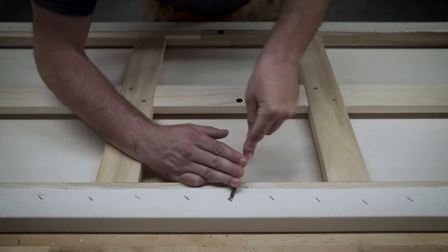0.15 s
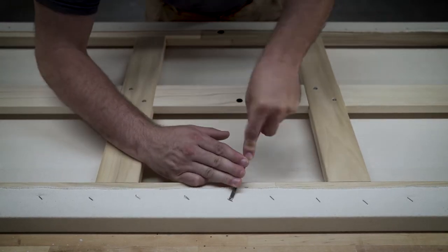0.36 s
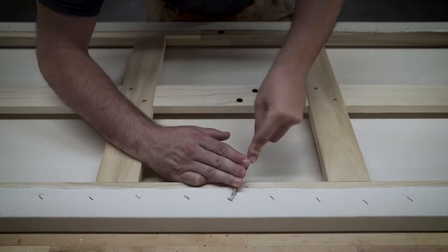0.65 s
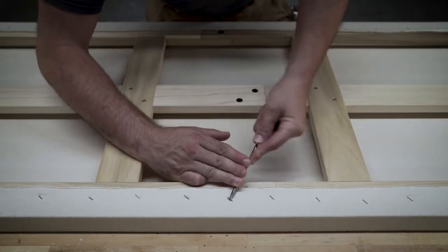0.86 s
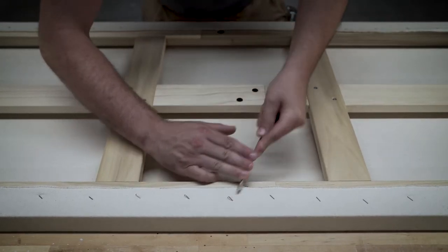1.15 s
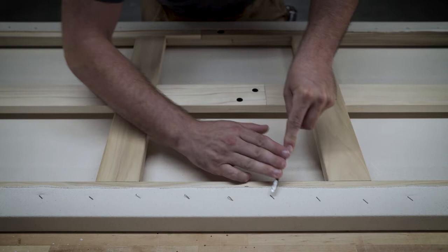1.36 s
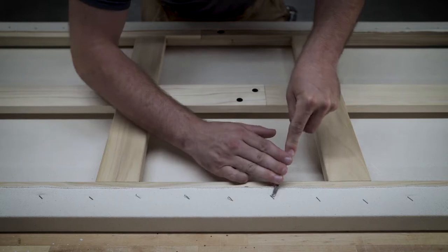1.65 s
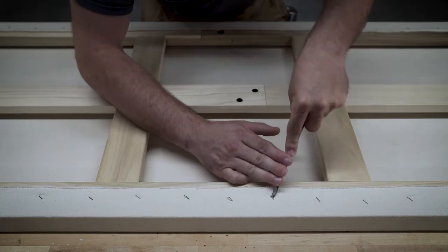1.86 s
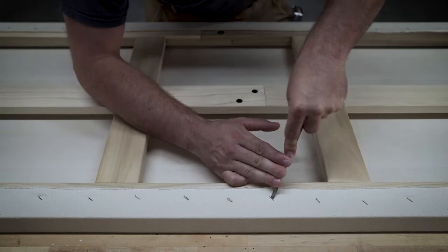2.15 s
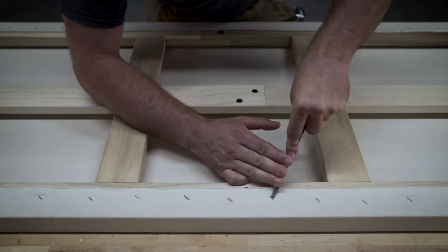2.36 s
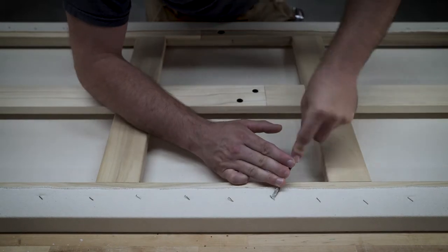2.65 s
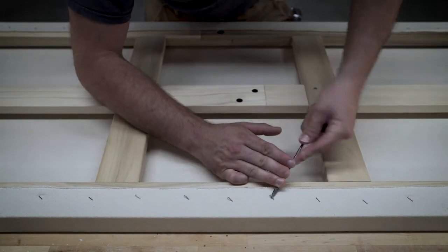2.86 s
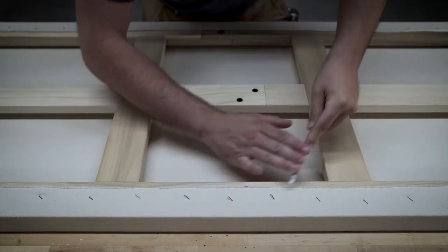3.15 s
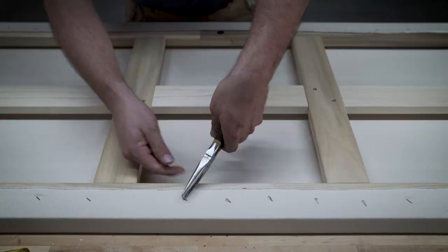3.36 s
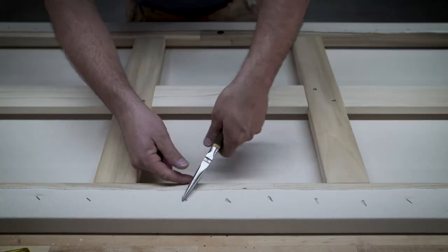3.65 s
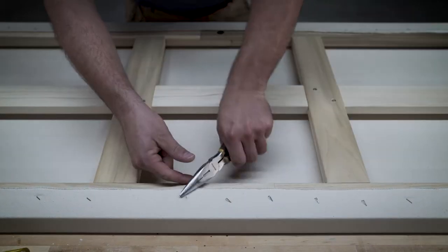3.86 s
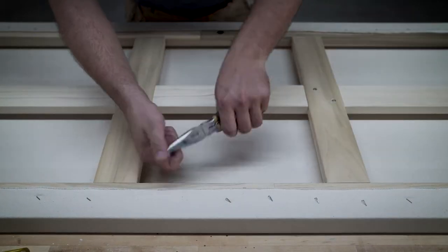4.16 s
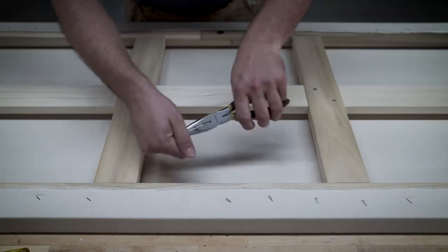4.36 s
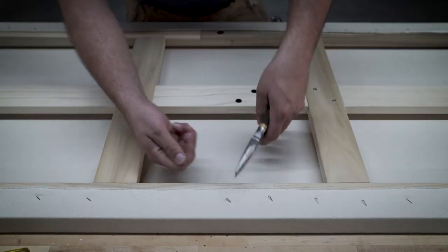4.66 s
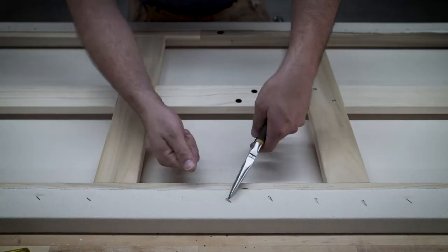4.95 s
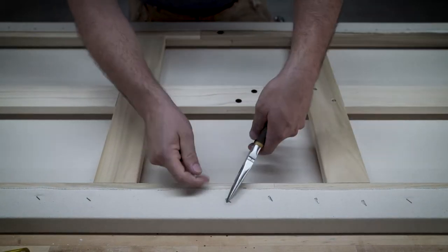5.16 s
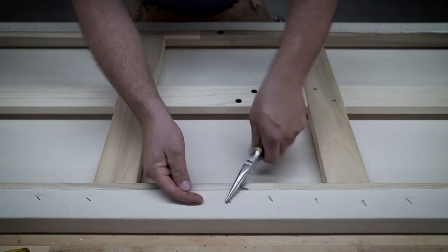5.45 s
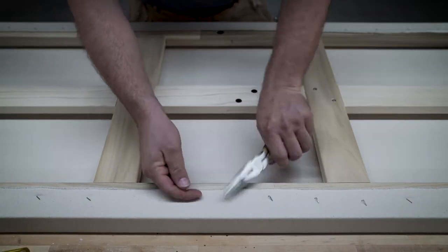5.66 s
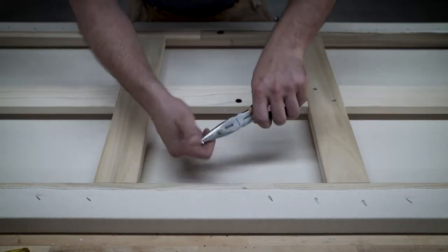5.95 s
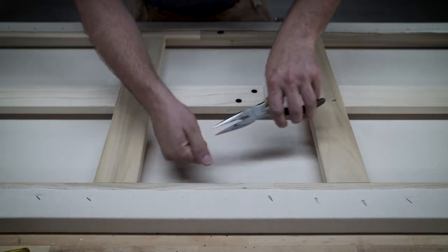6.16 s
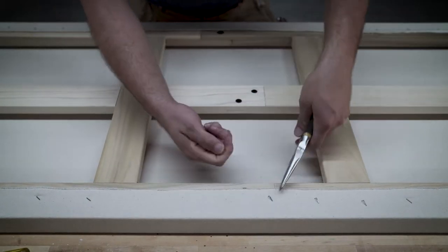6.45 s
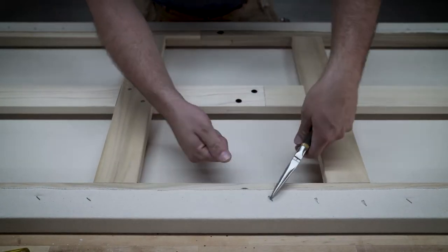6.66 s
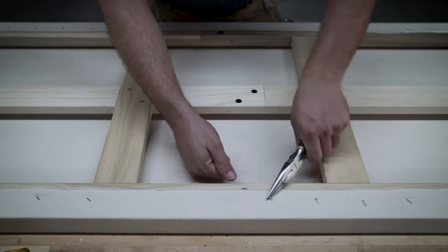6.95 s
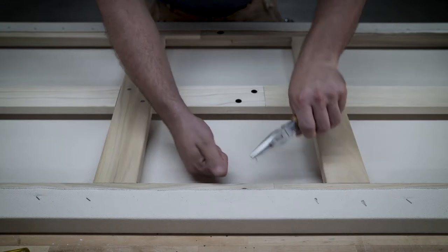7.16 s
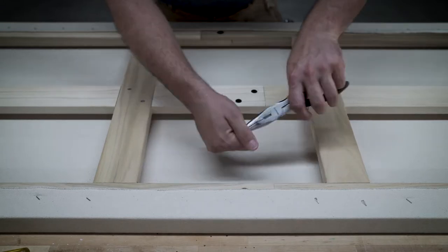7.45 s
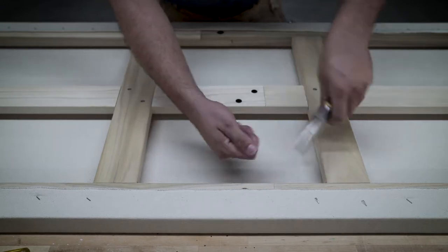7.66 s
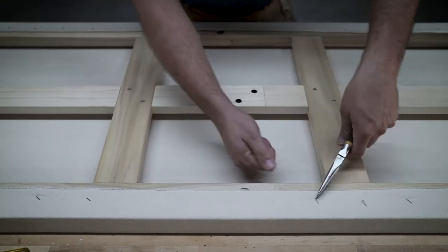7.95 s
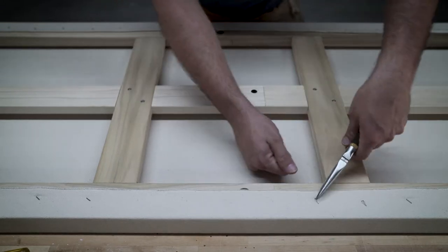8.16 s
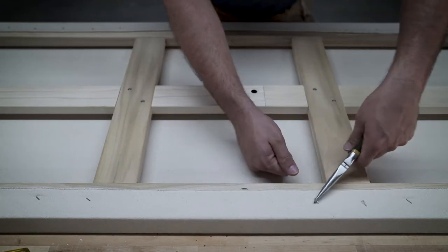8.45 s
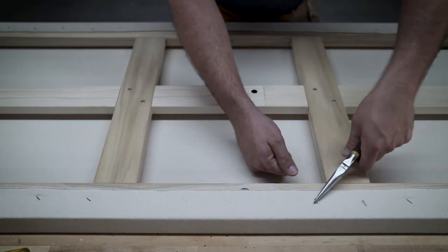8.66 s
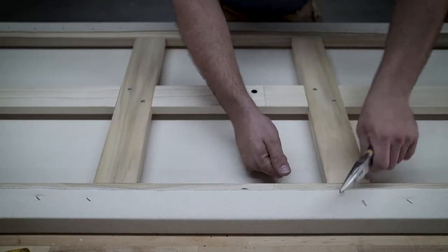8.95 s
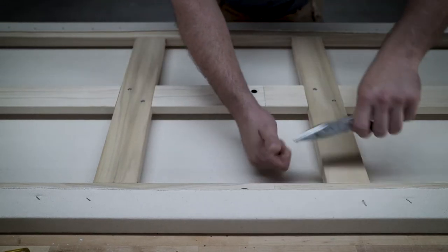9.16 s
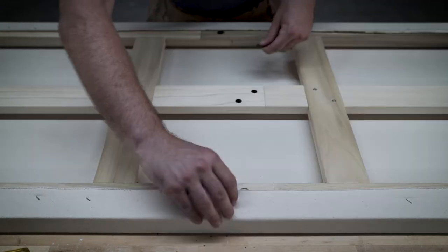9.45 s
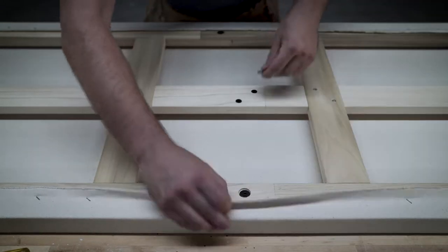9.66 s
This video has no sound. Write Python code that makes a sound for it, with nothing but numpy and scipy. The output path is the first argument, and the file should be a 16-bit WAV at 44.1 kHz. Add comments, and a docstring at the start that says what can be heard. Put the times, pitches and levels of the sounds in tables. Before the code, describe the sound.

Steel tool knocks and scrapes on a wooden frame, then staples snap free of canvas with sharp loud cracks over a faint fan hum.

```python
"""A fan hums faintly throughout, and a small workshop answers every contact with noise-like reverberation.
First a thin steel lever, then heavy long-nosed pliers work staples out of a canvas on a wooden frame.
Knocks and ticks are filtered impulses with modes, thumps are slow modes; creaks and rustles are runs of tiny slips.
Each staple snaps free, often one leg after the other: a crack with scatter, a jolt in the wood, a ring of wire."""
import sys
import numpy as np
from scipy import signal
from scipy.fft import rfft, irfft, next_fast_len
from scipy.io import wavfile

SR = 44100
rng = np.random.default_rng(int(sys.argv[2]) if len(sys.argv) > 2 else 0)


def transcribe(u):
    """Save the signal u as a 16-bit wav file named by the first command-line argument.

    u: samples, shape (n,) or (channels, n), limited to [-1, 1]; the rate is SR.
    q: integer samples, one column per channel.
    """
    v = np.clip(np.atleast_2d(u).T, -1, 1)
    q = np.round(v * 32767).astype(np.int16)
    wavfile.write(sys.argv[1], SR, q)


N = 432621
SIZE = 16384  # samples of one event
AGE = np.arange(SIZE) / SR  # s since the event began


def undb(db):
    """Level in dB to amplitude."""
    return 10 ** (np.asarray(db) / 20)


def unit(x):
    """Scale to rms 1."""
    return x / np.sqrt(np.mean(x ** 2))


def add(track, time_s, sound):
    """Mix a sound into a track at a time."""
    i = max(int(time_s * SR), 0)
    track[i:i + len(sound)] += sound[:max(N - i, 0)]


def bins_hz(size):
    """Frequencies of the bins of a spectrum."""
    return np.arange(size // 2 + 1) * SR / size


def along(points, size):
    """Interpolate (Hz, value) points over log frequency on the bins of a spectrum."""
    hz, value = np.transpose(points)
    return np.interp(np.log(bins_hz(size) + 1), np.log(np.sort(hz)), value)


def response(colour, centre_hz):
    """Minimum-phase impulse response of a colour moved from 1 kHz to a centre, peak 1."""
    moved = [(hz * centre_hz / 1000, db) for hz, db in colour]
    cepstrum = irfft(np.log(undb(along(moved, SIZE))))
    # fold the cepstrum forward in time: nothing sounds before the push
    cepstrum[1:SIZE // 2] *= 2
    cepstrum[SIZE // 2 + 1:] = 0
    h = irfft(np.exp(rfft(cepstrum)))
    return h / np.abs(h).max()


def blow(colour, centre_hz, fade_s, scatter_db):
    """One sharp push and a dying scatter of smaller ones, heard through a colour."""
    push = undb(scatter_db) * rng.standard_normal(SIZE) * np.exp(-AGE / fade_s)
    push[0] = 1
    return signal.fftconvolve(push, response(colour, centre_hz))[:SIZE]


def ring(hz, t60_s):
    """One mode: a sine that decays by 60 dB in t60."""
    return np.sin(2 * np.pi * hz * AGE) * np.exp(-np.log(1000) * AGE / t60_s)


# spectrum of the background air: (frequency [Hz], relative level per Hz [dB])
AIR = [(15, -59.5), (25, -35.5), (43, -19.5), (134, -15), (195, -17), (236, -12), (384, -14), (427, -6.5),
       (476, -12), (607, -18.5), (659, -14.5), (962, -17), (1370, -20.5), (3160, -27), (16000, -36)]
# fan tones: (frequency [Hz], width [Hz], level [dB])
FAN = [(425.9, 12, -64.5), (618.8, 17, -69), (900, 62, -72.5), (1950, 100, -72.5), (13297, 200, -89.5)]


def fan():
    """Even air noise with a few narrow, wavering tones cut from noise by resonance curves."""
    size = next_fast_len(N, True)
    hz = bins_hz(size)
    air = unit(irfft(rfft(rng.standard_normal(size)) * undb(along(AIR, size)), size))
    noise = rfft(rng.standard_normal(size))
    tones = 0
    for tone_hz, width_hz, db in FAN:
        resonance = 1 / (1 + (2 * (hz - tone_hz) / width_hz) ** 2)
        tones = tones + undb(db) * unit(irfft(noise * resonance, size))
    return (undb(-59.5) * air + tones)[:N]


# workshop reverberation bands: (centre [Hz], t60 [s], relative level [dB])
ROOM = [(80.04, 0.31, -1), (250, 0.47, 4.5), (633, 0.51, 4.5), (1500, 0.43, 5.5), (3000, 0.62, -7),
        (5200, 0.43, -1), (7200, .47, 0), (9500, 0.32, -2), (15440, .25, -9)]


def room(x, wet_db, build_s=.002):
    """Diffuse reflections build up quickly, then die at each band's own rate."""
    t = np.arange(SR) / SR
    noise, tail = rfft(rng.standard_normal(SR)), 0
    for k, (_, t60_s, db) in enumerate(ROOM):
        # this band's share: 1 at its centre, 0 at its neighbours'
        share = along([(row[0], j == k) for j, row in enumerate(ROOM)], SR)
        tail = tail + undb(db) * irfft(noise * share, SR) * np.exp(-np.log(1000) * t / t60_s)
    tail = tail * (1 - np.exp(-t / build_s))
    return undb(wet_db) * signal.fftconvolve(x, tail)[:N]


def hollow(x, centre_hz, depth):
    """The bounce off the workbench partly cancels one band."""
    band = signal.lfilter(*signal.iirpeak(centre_hz, 2, fs=SR), x)
    return x - np.clip(depth, 0, 1) * band


# low thumps of frame and cloth: soft pushes, pliers landing, recoils of snaps:
# (time [s], level [dB], centre of the thump [Hz])
BUMPS = [(.005, -45, 75), (0.823, -47, 184), (3.446, -37, 360), (3.763, -47.5, 350), (4.013, -47, 220),
         (4.066, -34.5, 229), (5.297, -47, 330), (5.351, -45, 130), (5.412, -49, 90), (5.825, -47, 150),
         (6.746, -35, 360), (6.915, -42, 125), (7.004, -30, 99), (7.149, -32, 235), (8.253, -39, 160),
         (8.378, -41.5, 350), (8.724, -44, 127), (9.063, -37, 161.4)]
# slow modes of the frame with its stretched cloth: (frequency [Hz], relative level [dB], t60 [s])
SWAY = [(75, -9, .42), (92, -2, 0.24), (125, 0.5, .2), (201, 1.5, 0.15), (239, -1, 0.098), (360, 2, 0.33)]
SWAY_DB_PER_OCTAVE, BUMP_RISE_S = -11.5, 0.0056


def bumps():
    """A thump sets frame and cloth swinging, most in the modes near its own centre."""
    out = np.zeros(N)
    for time_s, db, bump_hz in BUMPS:
        swing = 0
        for hz, mode_db, t60_s in SWAY:
            octaves_off = abs(np.log2(hz / bump_hz))
            swing = swing + undb(mode_db + SWAY_DB_PER_OCTAVE * octaves_off) * ring(hz, t60_s)
        add(out, time_s, undb(db) * swing * (1 - np.exp(-AGE / BUMP_RISE_S)))
    return out


def friction(strokes, colour, slips_per_s, grain_db, catch_db):
    """A stroke is a swelling run of tiny uneven slips that catches and frees; it lasts SIZE samples at most."""
    out = np.zeros(N)
    for start_s, end_s, db, hz in strokes:
        sizes = undb(grain_db * np.minimum(rng.exponential(size=SIZE), 3))
        catches = undb(catch_db * np.repeat(rng.standard_normal(SIZE // 256), 256))  # 256-sample steps
        struck = rng.random(SIZE) < slips_per_s / SR
        slips = struck * rng.choice([-1, 1], SIZE) * sizes * catches
        rub = unit(signal.fftconvolve(slips, response(colour, hz))[:SIZE])
        progress = np.clip(AGE / max(end_s - start_s, .005), 0, 1)
        swell = np.abs(np.sin(np.pi * progress)) ** .75
        add(out, start_s, undb(db) * rub * swell)
    return out


# rustles and slides over the canvas, and one faint high tinkle:
# (start [s], end [s], level [dB], centre [Hz])
SLIDES = [(.912, .955, -48.5, 4030), (1.235, 1.305, -49.5, 4330), (2.903, 2.922, -42, 4303),
          (3.205, 3.27, -49, 4000), (3.84, 3.96, -59, 7000), (4.94, 5.08, -50, 4000),
          (5.273, 5.295, -46.5, 4120), (5.59, 5.66, -56.5, 7000), (6.67, 6.765, -49.5, 4000),
          (6.83, 6.865, -51, 4500), (6.895, 6.935, -50, 6000), (6.208, 6.232, -53.5, 10000),
          (7.598, 7.632, -43, 9050), (8.343, 8.375, -44.5, 4600), (8.59, 8.625, -35.5, 4830),
          (8.81, 8.88, -58, 6000), (9.50, 9.70, -57, 6530), (9.73, 9.81, -57, 7700)]
# their colour, centred on 1 kHz: (frequency [Hz], relative level [dB])
CLOTH = [(100, -23), (400, -7.5), (750, -2), (1100, -3.5), (1600, -10), (2500, -21), (4500, -38.5)]


def slides():
    """Rustles and slides over the canvas, and one faint high tinkle, all as runs of uneven slips."""
    return friction(SLIDES, CLOTH, slips_per_s=1300, grain_db=3, catch_db=2.5)


# drags of the steel point: (start [s], end [s], level [dB])
SQUEAKS = [(1.165, 1.56, -65.5), (2.011, 2.153, -58.5), (3.2, 3.244, -64), (3.502, 3.619, -56),
           (4.937, 5.05, -57)]
# resonances of the dragged point, the lowest at 1 kHz: (frequency [Hz], relative level [dB])
SQUEAK = [(400, -20), (850, -8), (1000, 0), (1150, -31), (1350, -4), (1500, -10), (1650, -16), (1950, -13),
          (2220, -5.5), (2450, -24), (6000, -21.5)]
SQUEAK_HZ = 2100  # where the lowest resonance is moved


def squeaks():
    """The dragged steel point sings faintly: slips excite its resonances."""
    strokes = [(*row, SQUEAK_HZ) for row in SQUEAKS]
    return friction(strokes, SQUEAK, slips_per_s=760, grain_db=1.5, catch_db=0)


# creaks and rasps of wire, wood and pulled canvas: (start [s], end [s], level [dB])
CREAKS = [(.01, 0.042, -55.5), (0.789, 0.846, -46), (1.223, 1.305, -48), (2.008, 2.135, -52.5),
          (3.20, 3.253, -47), (3.652, 3.682, -46.5), (3.851, 3.993, -45), (3.993, 4.048, -39.5),
          (5.286, 5.354, -47.5), (5.575, 5.714, -46), (5.787, 5.809, -37), (6.733, 6.771, -40.5),
          (6.852, 6.884, -40), (6.899, 6.93, -34.5), (6.96, 7.096, -45), (7.104, 7.139, -34.5),
          (8.592, 8.641, -33), (8.665, 8.919, -46.5), (9.549, 9.604, -33)]
# their colour, centred on 1 kHz: (frequency [Hz], relative level [dB])
CREAK = [(80, -33.5), (240, -9), (400, 2), (620, -6), (850, -1.5), (1000, -4.5), (1300, -9.5), (1800, -14),
         (4000, -30), (10000, -42.5)]
CREAK_HZ = 1584


def creaks():
    """Wire, wood and pulled canvas creak and rasp in runs of uneven slips."""
    strokes = [(*row, CREAK_HZ) for row in CREAKS]
    return friction(strokes, CREAK, slips_per_s=950, grain_db=3, catch_db=2.0)


# light ticks, and one dull knock: (time [s], level [dB], centre [Hz])
TICKS = [(0.8285, -31, 3330), (1.0015, -21.5, 4000), (1.2115, -35.5, 2500), (1.2917, -27, 3000),
         (3.2247, -35, 2440), (3.996, -28.5, 2297), (6.128, -38.5, 3350), (7.6003, -26.5, 3600),
         (7.6109, -34.5, 2340), (7.6204, -37, 2180), (8.2505, -35, 1500), (8.3695, -16, 4840),
         (8.471, -41.5, 3860), (8.6046, -26, 3000), (9.0335, -29.5, 3200), (9.3923, -34.5, 2730)]
# colour of steel, centred on 1 kHz, also in the knocks: (frequency [Hz], relative level [dB])
STEEL = [(60, -29.5), (250, -10), (550, -3.5), (900, -3.5), (1500, -11), (2300, -19), (3300, -23.5),
         (5000, -25)]
# modes of the steel tool, damped by the hand: (frequency [Hz], relative level [dB], t60 [s])
TOOL = [(2200, -28.5, 0.015), (2800, -26.5, .015), (3620, -15.5, 0.03), (4510, -14, .015),
        (6340, -29.5, 0.009)]


def ticks():
    """Light ticks and one dull knock; the tool rings briefly, differently each time."""
    out = np.zeros(N)
    for time_s, db, hz in TICKS:
        rings = 0
        for mode_hz, mode_db, t60_s in TOOL:
            rings = rings + rng.uniform(-1, 1) * undb(mode_db) * ring(mode_hz, t60_s)
        add(out, time_s, undb(db) * (blow(STEEL, hz, fade_s=0.0029, scatter_db=-18.5) + rings))
    return out


# modes of the frame: (frequency [Hz], relative level [dB], t60 [s])
FRAME = [(153.6, -16.5, 0.084), (176, -15, 0.14), (255, -9.5, 0.059), (329.6, -3.5, 0.11), (360, -15, 0.33),
         (410, -2.5, .08), (472.4, -6, 0.12), (563.4, -8.5, .09), (641, -6.5, 0.069), (783, -6, 0.18),
         (1345, -6, .05), (1660, -2, 0.077)]


def frame(spread_db=3, detune=0.025):
    """The frame's modes, peak 1; each place of contact and grip weights and shifts them differently."""
    modes = 0
    for hz, db, t60_s in FRAME:
        weight, shift, sign = rng.standard_normal(3)
        mode = ring(hz * (1 + detune * shift), t60_s)
        modes = modes + np.sign(sign) * undb(db + spread_db * weight) * mode
    return modes / np.abs(modes).max()


def bend(x, lag_s, fast_hz):
    """Bending waves in wood travel faster the higher they are, so the lows arrive late: a downward sweep."""
    size = next_fast_len(N + SR, True)
    hz = bins_hz(size) + SR / size
    delay_s = lag_s * np.maximum(np.sqrt(fast_hz / np.maximum(hz, 100)) - 1, 0)
    phase = 2 * np.pi * np.cumsum(delay_s) * SR / size  # phase is delay summed over frequency
    return irfft(rfft(x, size) * np.exp(-1j * phase), size)[:N]


# tool knocks on the frame: (time [s], wood level [dB], wood centre [Hz], relative steel level [dB])
KNOCKS = [(0.194, -42.5, 540, -56), (0.251, -25.5, 1050, -66), (0.51, -41, 640, -68),
          (0.541, -30.5, 630, -72), (0.651, -17.5, 1180, -63), (0.822, -35, 695, -61),
          (0.883, -41, 627, -51), (0.907, -41, 660, -68), (1.613, -31.5, 517, -44.5),
          (2.059, -34.5, 720, -69), (2.35, -20.5, 1380, -38), (2.561, -24.5, 1280, -62),
          (2.801, -40, 716, -64), (2.858, -33.5, 666, -44), (3.093, -39, 760, -49), (3.444, -41, 433, -50),
          (3.485, -39.5, 454, -50.5), (3.705, -37, 480, -43), (3.759, -25, 527, -45),
          (3.845, -30, 1550, -36.5), (3.927, -29.5, 580, -63), (3.946, -37.5, 617, -36.5),
          (5.291, -21, 700, -27.5), (5.328, -28, 665, -45), (5.346, -33, 640, -48),
          (5.388, -35, 410, -48.5), (5.496, -25, 700, -42.5), (5.602, -34.5, 1660, -65),
          (6.736, -29.5, 645, -41.5), (6.759, -28.5, 422, -60), (6.861, -28.5, 650, -48),
          (6.916, -22.5, 675, -35), (6.968, -17.5, 503, -26.5), (8.376, -33.5, 426, -31),
          (8.611, -17, 1730, -35), (8.714, -24.5, 790, -32.5), (8.778, -39.5, 590, -43),
          (9.576, -25.5, 1700, -60)]
# colour of wood, centred on 1 kHz, also in the snaps: (frequency [Hz], relative level [dB])
WOOD = [(100, -26), (300, -15.5), (600, -4), (1000, 7.5), (1600, -2.5), (2500, -6.5), (5000, -28.5),
        (14000, -65.5)]
PLIERS_FROM_S = 3.3  # the light lever is swapped for the heavy pliers
# frame level under a knock of KNOCK_DB; a hard-pressed tool damps it, so it gains less than 1 dB per dB
KNOCK_DB, LEVER_FRAME_DB, PLIERS_FRAME_DB, FRAME_DB_PER_DB = -30.5, -46, -32, 0.35


def knocks(scatter_db):
    """The steel tip ticks, the wood under it clacks, the whole frame rings on, more under the heavy pliers."""
    steel, wood = np.zeros(N), np.zeros(N)
    for time_s, wood_db, hz, steel_db in KNOCKS:
        frame_db = LEVER_FRAME_DB if time_s < PLIERS_FROM_S else PLIERS_FRAME_DB
        frame_db += FRAME_DB_PER_DB * (wood_db - KNOCK_DB)
        tip = blow(STEEL, centre_hz=4000, fade_s=0.0025, scatter_db=-10.5)
        clack = blow(WOOD, hz, fade_s=0.0073, scatter_db=scatter_db)
        add(steel, time_s, undb(steel_db + 5.5) * tip)
        add(wood, time_s, undb(wood_db) * clack + undb(frame_db) * frame())
    return steel + bend(wood, lag_s=0.002243, fast_hz=2365)


def wire_ring(hz, t60_s, spread=0.007):
    """A bent wire has clusters of close modes that beat."""
    return sum(ring(hz * (1 + spread * c), t60_s) for c in rng.standard_normal(4)) / 2


def splinter_db(fade_s, doubling_s=0.0027):
    """Energy that splintering adds to the first crack: the longer it lasts, the more."""
    return 10 * np.log10(1 + fade_s / doubling_s)


# a staple leg lets go: (time [s], crack level [dB], crack centre [Hz], splintering decay [s])
SNAPS = [(2.9342, 4.5, 5200, .0018), (4.0113, -6.5, 3430, 0.0045), (4.064, 1.5, 3190, 0.00092),
         (4.0787, -8.5, 2730, 0.0022), (5.811, -4, 3050, 0.0026), (5.8235, -9, 2800, 0.0061),
         (7.1367, -14.5, 3900, .001), (7.139, -2.5, 2600, .003), (7.1485, -7.5, 2900, 0.0023),
         (7.1510, 1, 3070, 0.00088), (9.0467, -7.5, 3800, .0011), (9.0505, -0.5, 3640, .0018),
         (9.0620, 3.5, 2830, 0.0021), (9.0645, -11, 1900, 0.0014), (9.0657, -3, 2630, .002),
         (9.078, -10, 3000, 0.0022)]
# colour of the crack, centred on 1 kHz: (frequency [Hz], relative level [dB])
CRACK = [(30, -31.5), (100, -19.5), (230, -12.5), (360, -13), (650, -4), (1000, -1.5), (1400, -9),
         (1800, -15.5), (2300, -22.5), (3300, -23), (4300, -25), (5500, -40)]
# the freed wire rings: (time [s], frequency [Hz], level [dB])
RINGS = [(4.065, 3065, -29), (4.065, 11670, -46), (7.151, 8340, -32), (7.151, 2650, -35),
         (9.066, 8270, -36.5)]
# a snap brighter than SNAP_HZ comes from the bare wire: less jolt in the wood, more sound thrown at the walls
SNAP_HZ, JOLT_DB, JOLT_DB_PER_OCTAVE, THROW_DB, THROW_DB_PER_OCTAVE = 3000, -17.5, -20, -3, 6.5


def snaps(scatter_db, far):
    """The wire jumps free: crack, jolt through the wood, thin ring of the staple; far: what the walls receive."""
    air, wood = np.zeros(N), np.zeros(N)
    for time_s, db, hz, fade_s in SNAPS:
        octaves = np.log2(hz / SNAP_HZ)
        throw_db = THROW_DB + THROW_DB_PER_OCTAVE * octaves + splinter_db(fade_s)
        gain = undb(db + far * throw_db)
        jolt = blow(WOOD, centre_hz=650, fade_s=0.0049, scatter_db=-17) + undb(-8.5) * frame()
        jolt_db = JOLT_DB + JOLT_DB_PER_OCTAVE * max(octaves, 0)
        add(air, time_s, gain * blow(CRACK, hz, fade_s, scatter_db))
        add(wood, time_s, gain * undb(jolt_db) * jolt)
    for time_s, hz, db in RINGS:
        add(air, time_s, undb(db) * wire_ring(hz, t60_s=.11))
    return air + bend(wood, lag_s=.0008, fast_hz=3000)


def scene():
    """Contacts close to the microphone, their reverberation, and the fan."""
    rubbing = creaks()
    light = ticks() + slides() + squeaks() + bumps()
    near = snaps(scatter_db=-17.5, far=False) + knocks(scatter_db=-17.5) + rubbing + light
    # summed over all directions, the scatter of a blow evens out: the walls get a smoother spectrum
    even_db = -34
    far_snaps = undb(-2.0) * snaps(even_db, far=True)
    far_knocks = undb(2.5) * knocks(even_db)
    far = far_snaps + far_knocks + rubbing + undb(-3) * light
    contacts = hollow(near + room(far, wet_db=-41.0), centre_hz=980, depth=0.25)
    return (contacts + fan())[None]


def record(dry):
    """The microphone thins the deep bass, the loudest snaps are clipped flat at full scale, the top is cut."""
    thin = signal.sosfilt(signal.butter(2, 50, "high", fs=SR, output="sos"), dry)
    clipped = np.clip(thin, -1, 1)
    return signal.sosfilt(signal.ellip(8, .2, 80, 16400, fs=SR, output="sos"), clipped)


dry = scene()
out = record(dry)
transcribe(out)
```